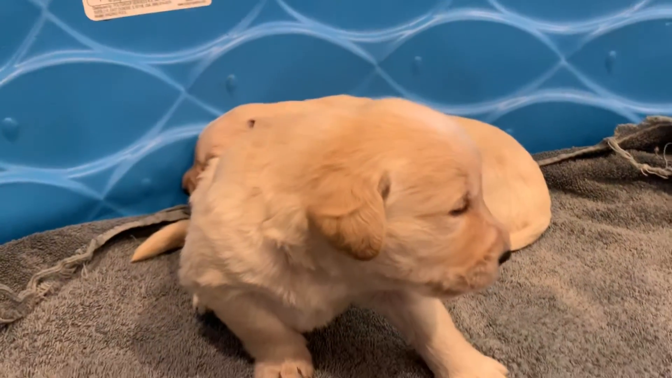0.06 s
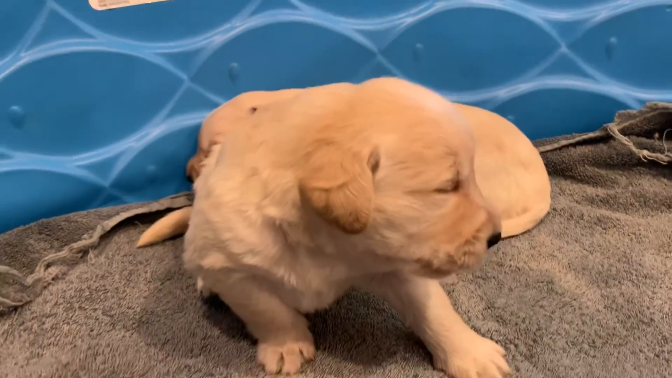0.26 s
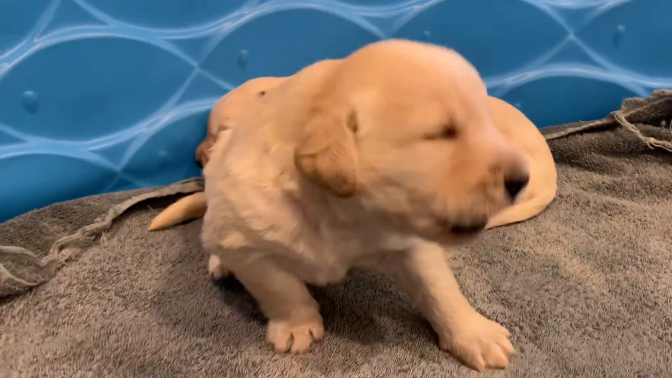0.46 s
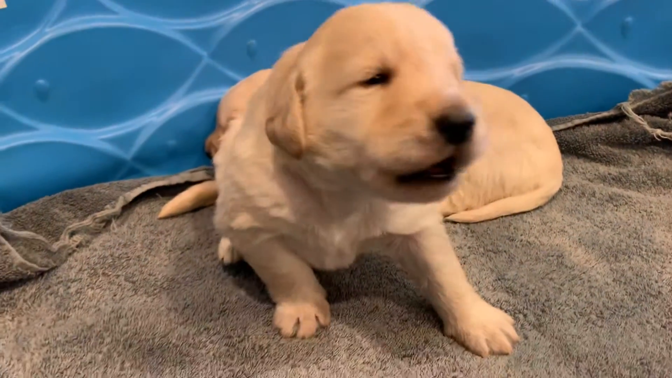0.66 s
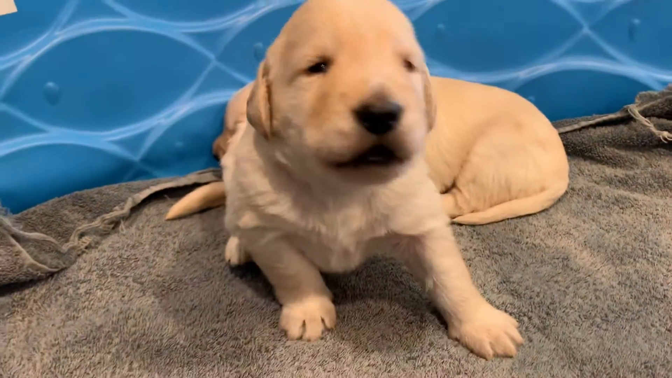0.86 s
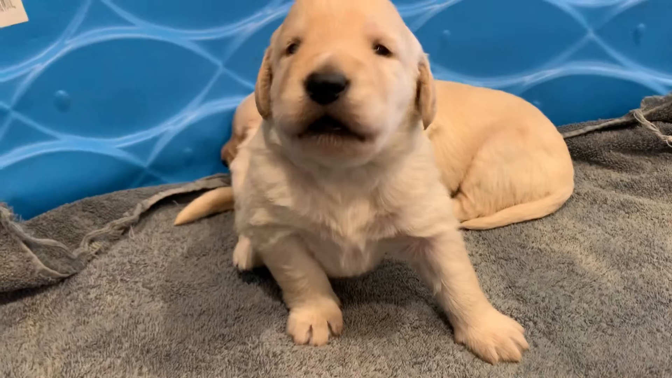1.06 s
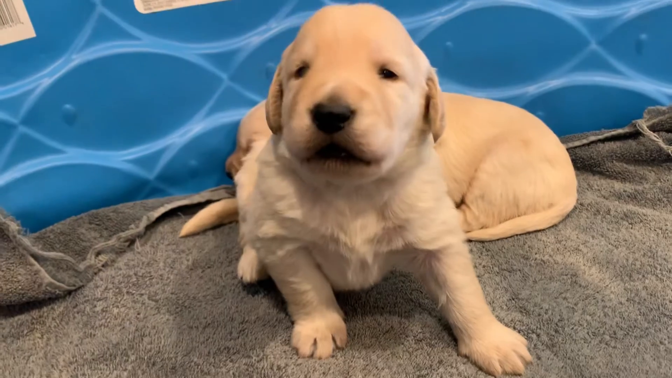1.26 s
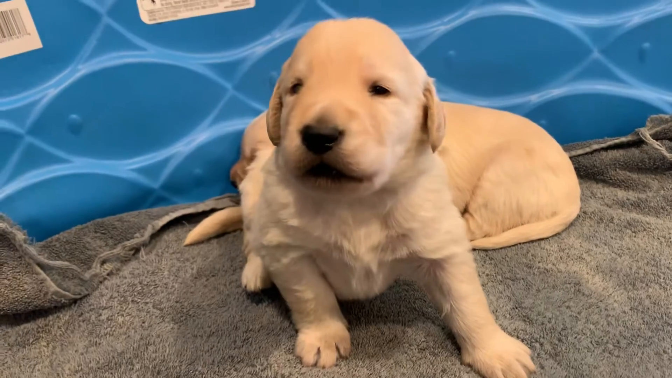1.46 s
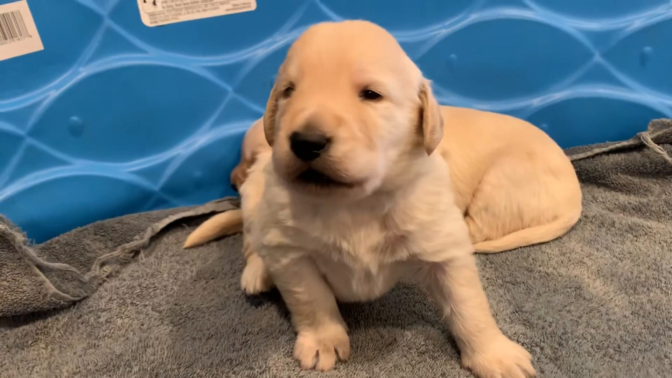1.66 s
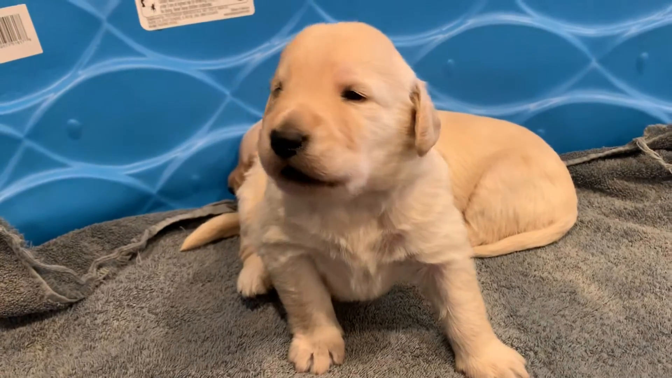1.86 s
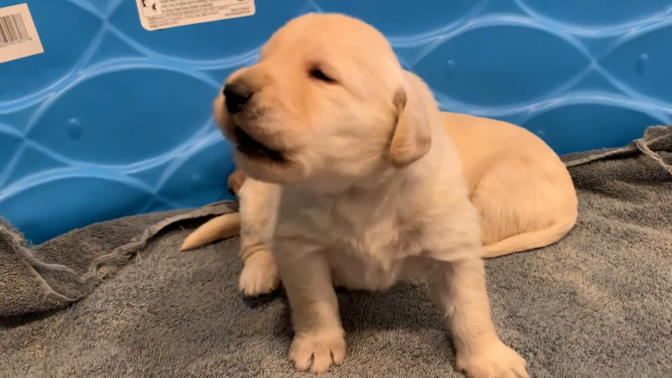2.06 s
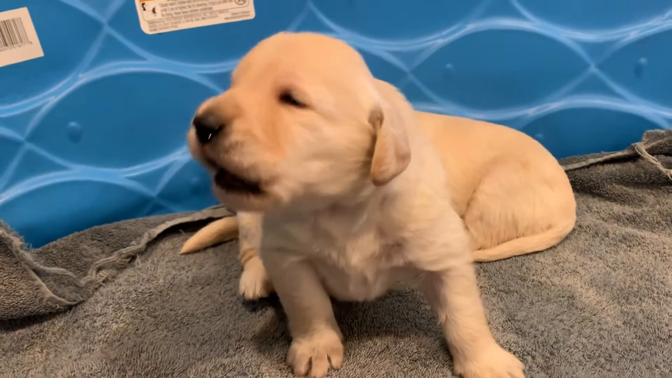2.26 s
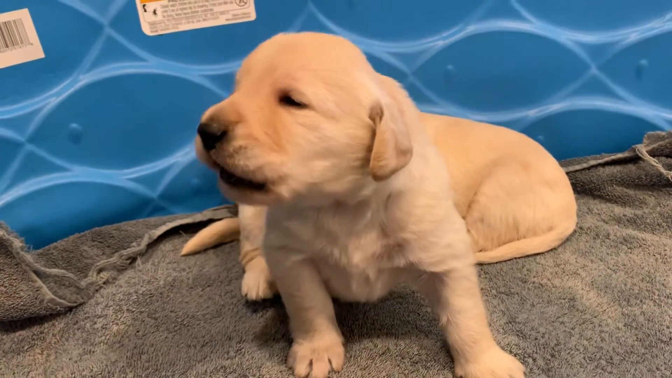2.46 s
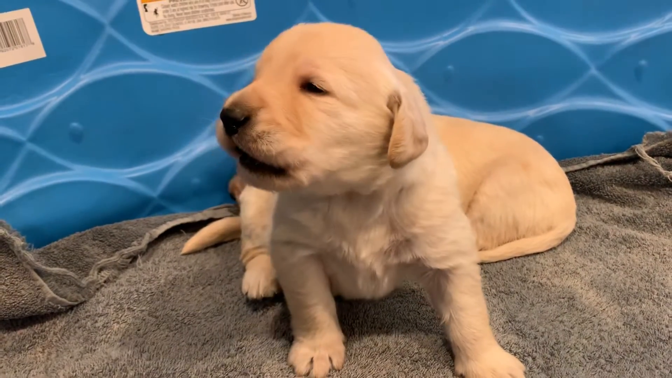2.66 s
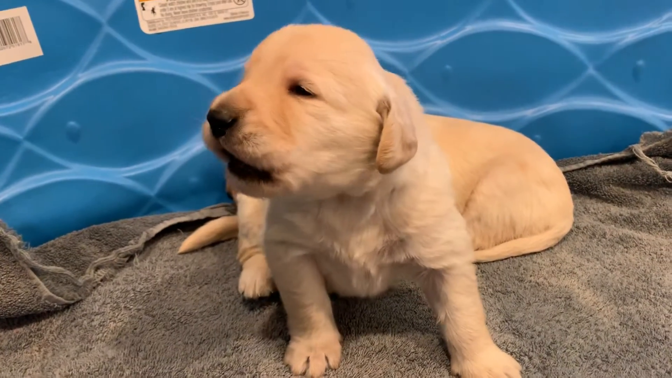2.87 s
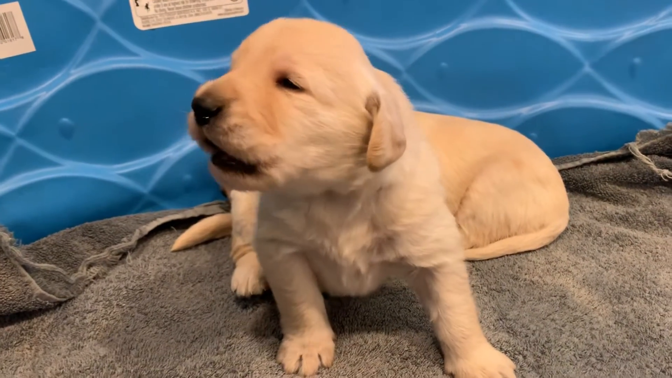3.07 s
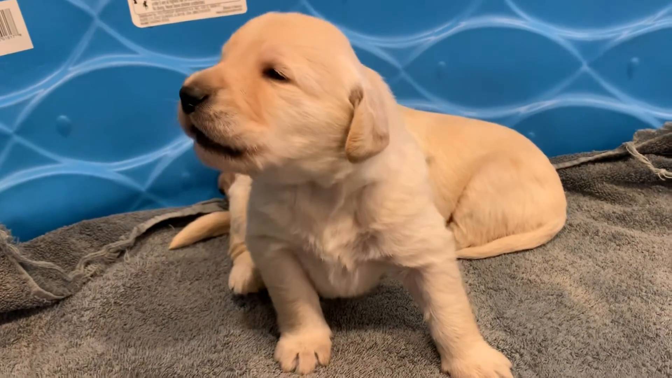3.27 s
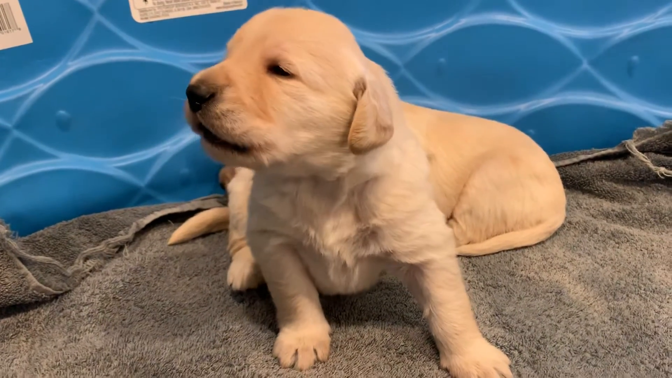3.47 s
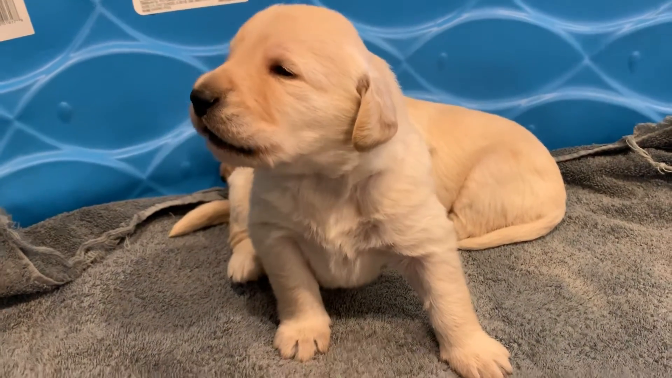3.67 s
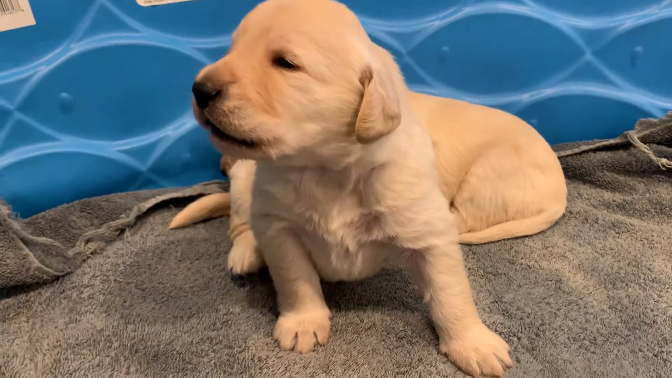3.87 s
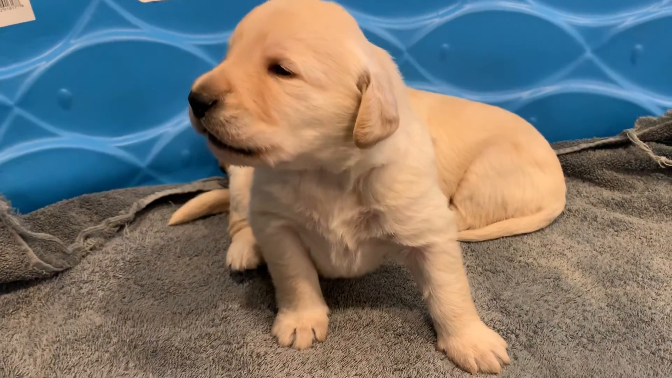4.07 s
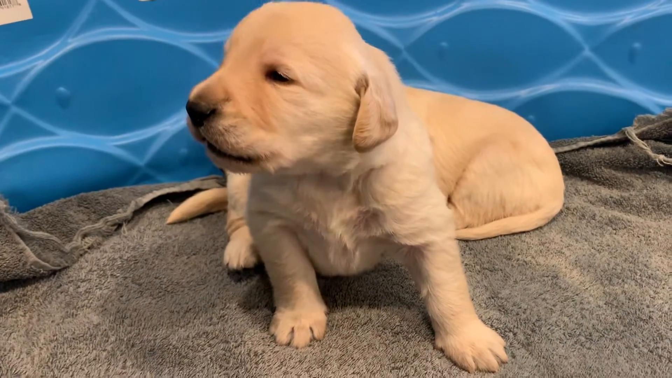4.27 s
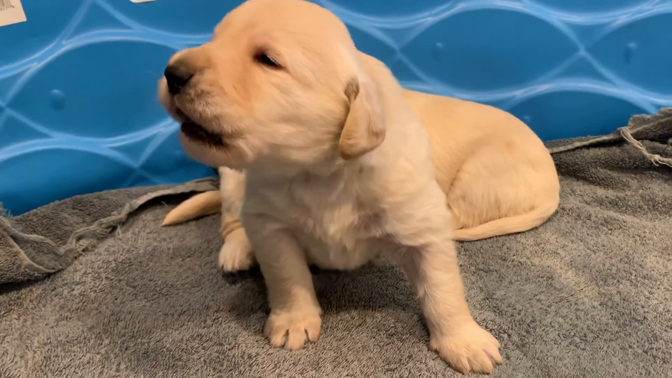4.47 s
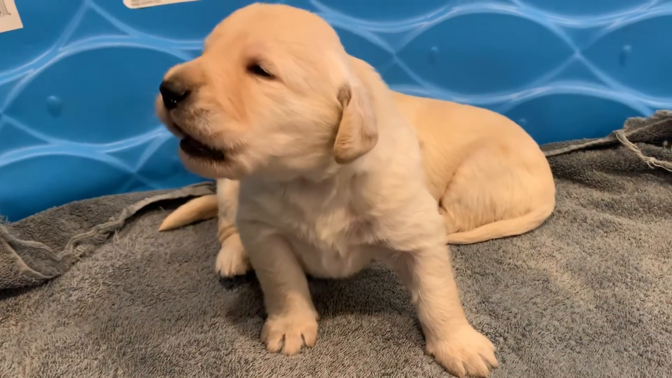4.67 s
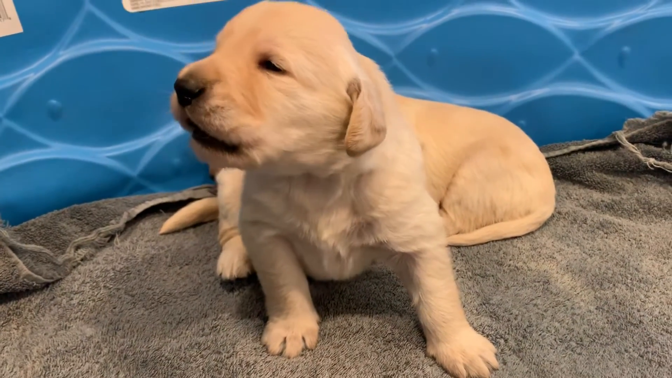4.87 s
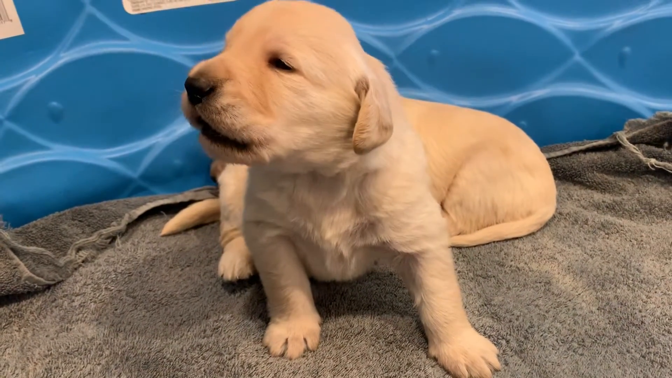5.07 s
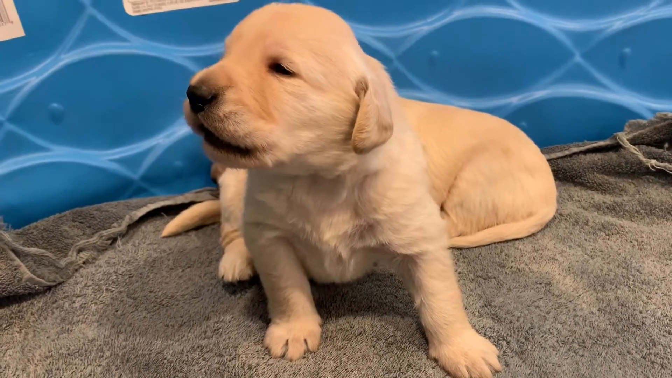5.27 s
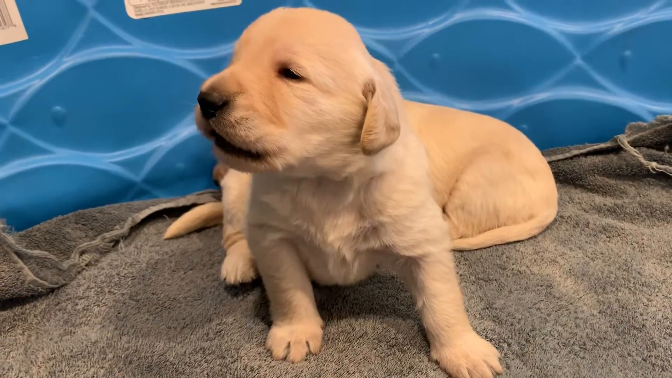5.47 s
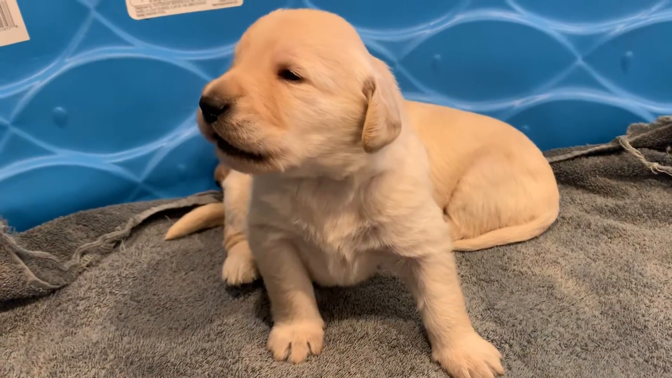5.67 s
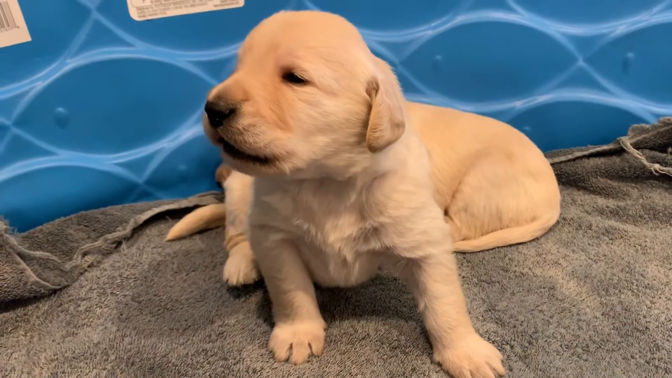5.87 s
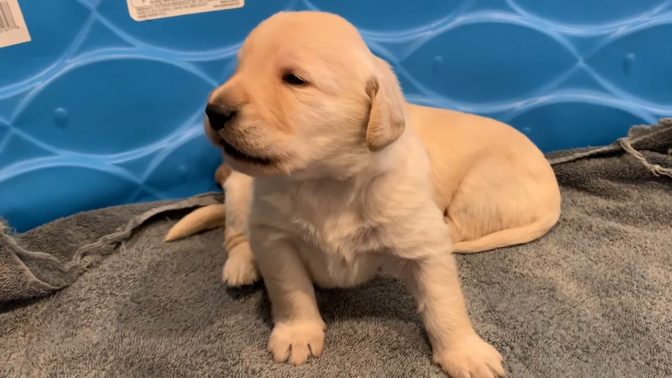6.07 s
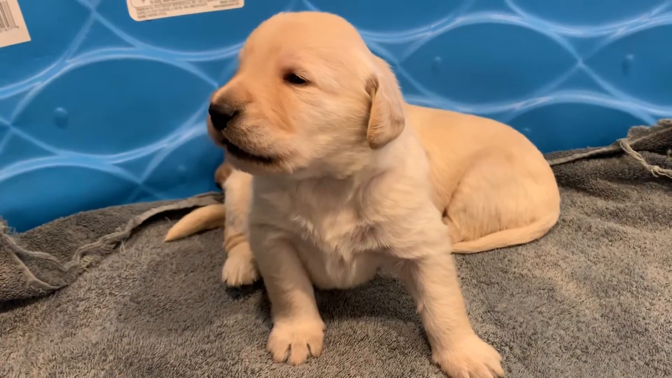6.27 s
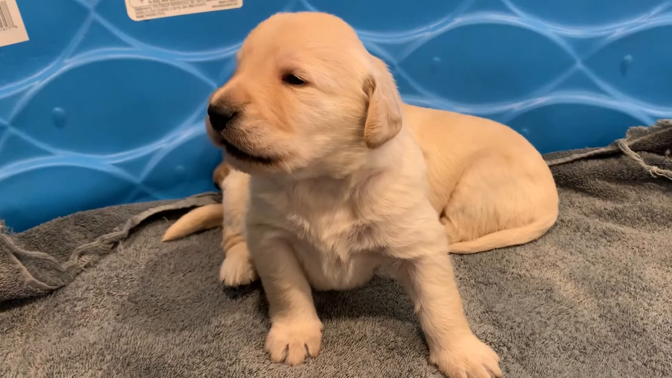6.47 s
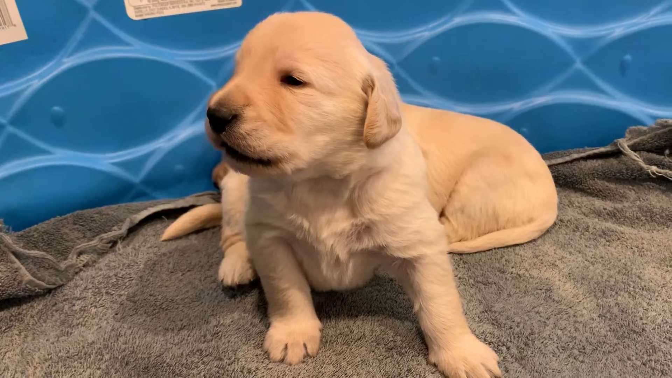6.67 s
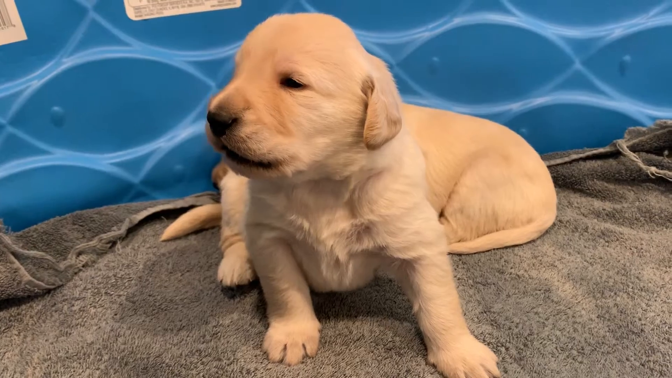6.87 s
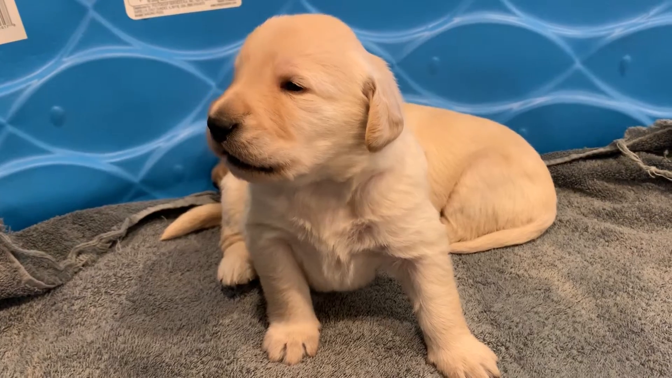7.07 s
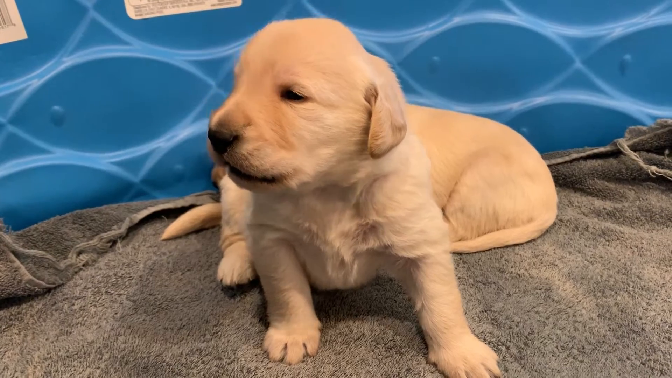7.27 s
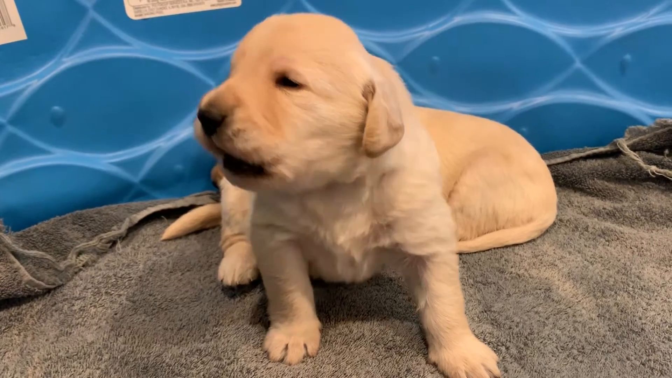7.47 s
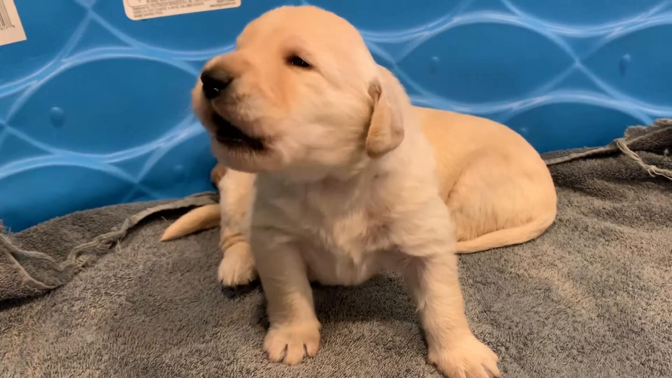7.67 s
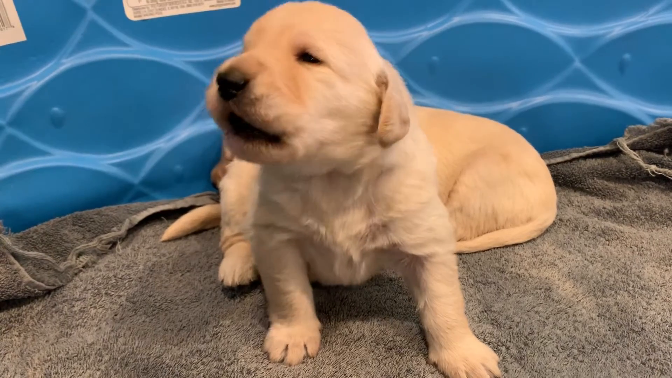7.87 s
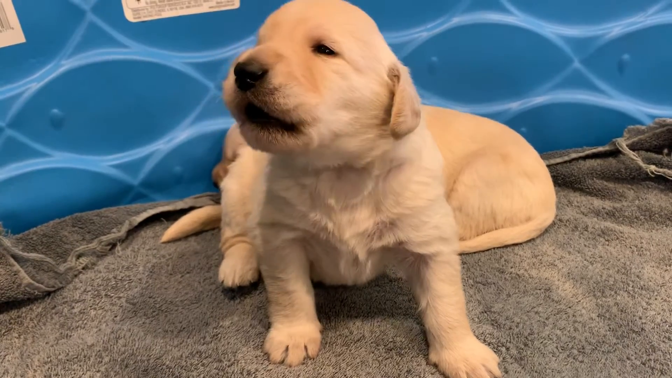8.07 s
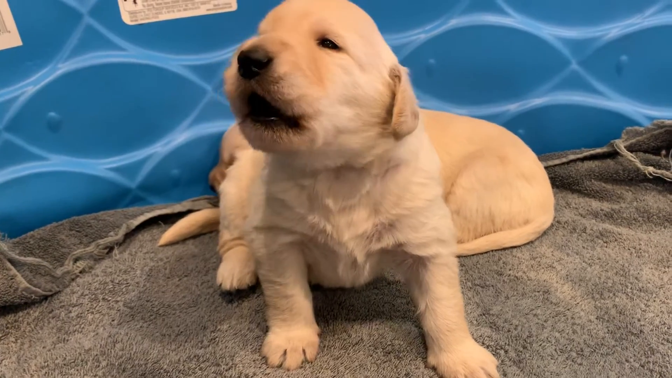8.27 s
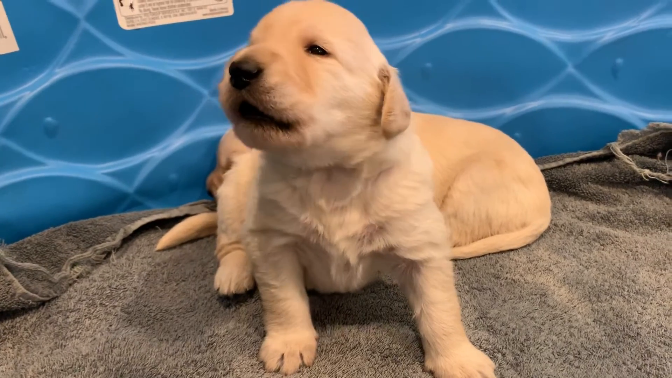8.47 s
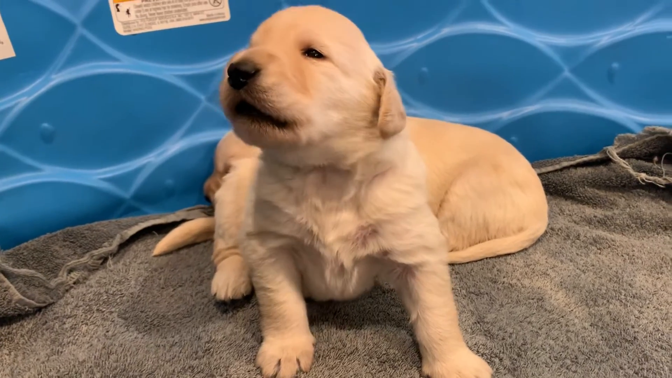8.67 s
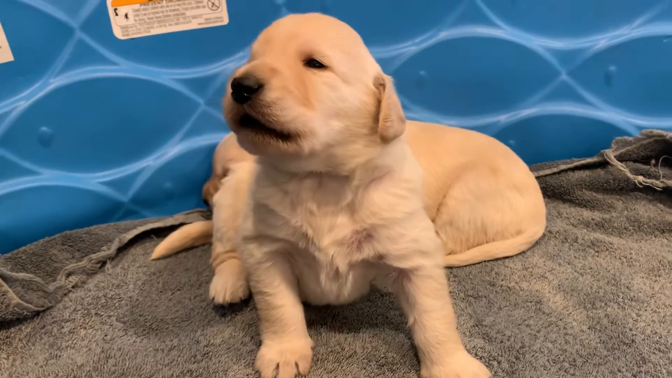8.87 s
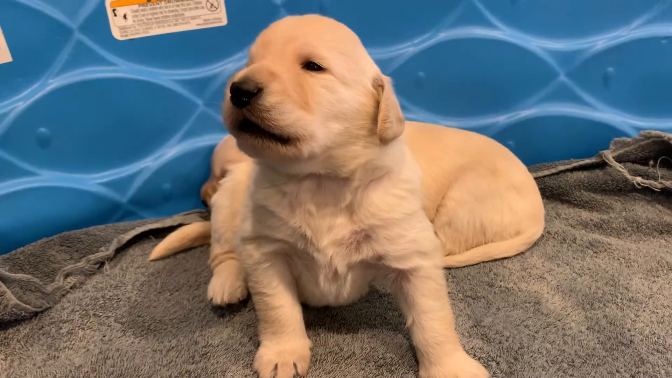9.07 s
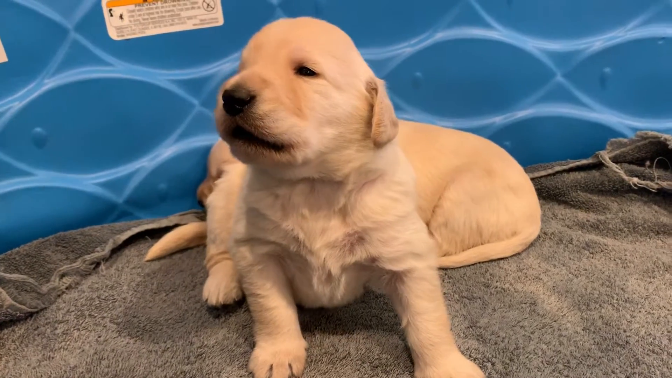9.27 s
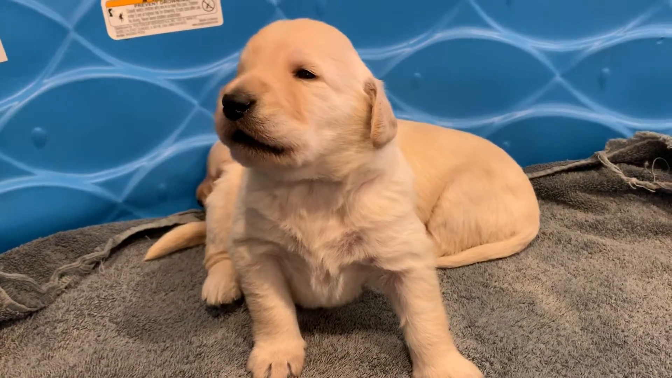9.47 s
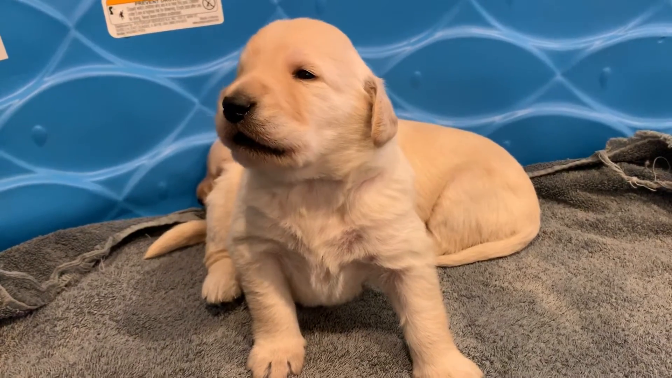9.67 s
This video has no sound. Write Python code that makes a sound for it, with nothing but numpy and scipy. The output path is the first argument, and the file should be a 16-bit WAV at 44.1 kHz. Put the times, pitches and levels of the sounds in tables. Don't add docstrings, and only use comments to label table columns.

```python
import sys
import numpy as np
from scipy import signal
from scipy.fft import rfft, irfft, next_fast_len
from scipy.io import wavfile
from scipy.ndimage import uniform_filter1d, minimum_filter1d, map_coordinates

SR = 44100
rng = np.random.default_rng(int(sys.argv[2]) if len(sys.argv) > 2 else 0)


def log_audio(samples):
    frames = np.atleast_2d(samples).T
    limited = np.clip(frames, -1, 1)
    pcm = np.round(limited * 32767).astype(np.int16)
    wavfile.write(sys.argv[1], SR, pcm)


def volts_from_db(level):
    exponent = np.asarray(level, float) / 20
    return 10 ** exponent


N = 428211
T = np.arange(N) / SR
TURN_S = 1.5
LOUD_CRY_HZ = 1100

# start/s, end/s
CALLS = [
    (0.03, 1.0),
    (2.02, 3.3),
    (4.416, 6.225),
    (7.503, 8.72),
]
# top t/s, top f/Hz, rise/s, fall/s, level/dB
YELPS = [
    (0.618, 1260, .12, 0.11, 2.4),
    (2.2, 1358, .175, .16, 1.13),
    (3.073, 972.2, .062, .08, -0.56),
    (4.585, 1353, .177, .15, 0.67),
    (7.68, 1377, .185, .17, -0.37),
    (8.359, 936, 0.084, .085, 2.2),
]
# undertone level/dB, top flatness/1, extra mouth/dB, extra rasp rising/dB, grip lost after top/s
YELP_COLOURS = [(-28, 3.4, 4, 8, .049), (-15, 2.1, 3, 7, 0.027), (-13, 2.2, 1, 1.6, 0.072),
                (-14, 2.1, 2, 5, 0.11), (-15.5, 2.3, 4, 9, 0.044), (-28, 2.6, -4, 2, 0.15)]
# t of a flap/s, flap rate/Hz
FLAPS = [(.09, 19.9), (.78, 20.1), (2.37, 19.9), (4.844, 21.1), (7.849, 22.3), (8.503, 19.2)]
# t/s, pitch f/Hz, level/dB, flutter level/dB, lips open level/dB
GROWL_1 = [(.03, 156, -40.5, 2, -18), (.09, 150, -36.5, 6.5, -18), (.35, 156.6, -33, -2, -16.5),
           (.45, 165, -35, -4.7, -5), (.76, 165.6, -36, 1.5, 8.5), (.86, 166.8, -37, -4.5, -0.5),
           (.92, 155, -33.5, 6, -28), (1.01, 148.4, -66, 4, 4)]
GROWL_2 = [(2.02, 170.3, -49.5, .3, 0.5), (2.42, 171.3, -33, 1.17, -4), (2.71, 167.5, -35, 1.2, -10.5),
           (2.76, 167.5, -33.5, 3.6, 0), (2.86, 163.8, -36.5, 0.98, 3), (2.95, 169.8, -32, 0.94, 10.5),
           (3.15, 164.8, -50, 0.77, 29), (3.239, 165, -46, 0.266, -3), (3.321, 155, -79, 0.23, -5)]
GROWL_3 = [(4.79, 175, -38, .3, -8), (4.819, 172.7, -31.5, .3, 6), (5.05, 164, -37, 1, 2.9),
           (5.55, 156, -38, 5.2, 1.5), (5.902, 141.1, -42.5, 13.3, -2.5), (6.06, 127.5, -48, 63, 0),
           (6.11, 132.6, -42, 15, -2), (6.202, 126.4, -47, 11, -1), (6.261, 124.7, -80, 7.6, -8)]
GROWL_4 = [(7.9, 189.5, -36, 2.5, -2.5), (7.959, 184.9, -31.5, 1.7, -0.5), (8.142, 178.9, -33.5, 0.17, 3),
           (8.221, 185, -31, 1.5, 9), (8.498, 165.8, -43, 0.7, 13), (8.559, 158.3, -35, 1.6, -16),
           (8.65, 146.8, -55, 4.1, -4), (8.74, 125.8, -107, 6, -13.5)]
# tension f/Hz, chest/dB, nose/dB, mouth/dB, rasp/dB
PUSH = [(155, -83, -86.5, -88, -93), (198.96, -35, -39.5, -39.5, -58), (320, -31, -29, -26.5, -33.5),
        (485, -35, -29.5, -20.5, -30), (690, -43, -25, -13, -25), (850, -53, -31, -26, -33),
        (970, -56, -21, -20, -19.5), (1120, -56, -48, -10, -21.5), (1400, -60.5, -38, -3.5, -21)]
# level/dB past the top, past the break, in the growl, chin down
FALLING_DB = [1, 1.94, 2, -7]
BROKEN_DB = [0, -0.97, -3.5, -4.5]
GROWL_DB = [-0.73, -8.5, -8, -21.5]
TUCK_DB = [-0.35, 2, -11, 5]
# dB per dB of growl softness, dB per dB of lip opening
THINNING = [.01, 1, 1, 0.21]
LIPS = [0.011, .2, .55, 1.2]
# f/Hz, width/Hz, level/dB
CHEST = [(200, 110, -5), (300, 90, 0)]
NOSE_DOWN = [(640, 330, 0)]
NOSE_UP = [(738, 285, 0)]
MOUTH = [(1295, 230, 0)]
# f/Hz, width/Hz, level/dB
RASP_TUCKED = [(1850, 500, 0), (4800, 990, -9), (6900, 1100, -4.5), (7650, 700, -7), (10100, 6900, -17)]
RASP_SHUT = [(1832, 400, -3), (4000, 330, 2.5), (5070, 630, -9), (6870, 1100, -3), (8780, 820, -5.5),
             (11190, 600, -4), (14200, 730, -14)]
# f/Hz, width/Hz, level/dB
RASP_GAPE = [(2070, 330, 1.5), (3130, 400, -5.5), (3730, 350, -1.5), (5900, 700, -4), (6900, 900, -8),
             (8600, 600, -13.5), (11550, 900, -13.5), (14600, 1200, -20)]
RASP_OPEN = [(2150, 1100, -4), (3400, 410, 0.5), (3814, 280, .5), (4974, 830, -5), (5916, 600, -3.5),
             (7030, 500, -7.5), (8600, 600, -11.5), (11340, 600, -11), (14600, 1200, -16.5)]
# f/Hz, left-right level/dB
FACING_DB = [(60, -2.5), (150, -6.5), (380, 4), (950, 4.5), (2380, 3.5), (5980, -13), (15000, 0)]
ACROSS_DB = [(60, 5), (150, -4), (380, 3), (950, 10.5), (2380, -1.5), (5980, -4), (15000, 3.5)]
# f/Hz, left lead/rad
FACING_RAD = [(0, 0), (2070, -0.5), (4480, 0.6), (6290, 7.9), (8610, 5.7), (10900, 0.2), (12300, -0.4),
              (15500, -12.8)]
ACROSS_RAD = [(300, 0.1), (1120, .5), (2200, 2.1), (3100, 2.9), (6980, 7.7), (9040, 3.9), (11300, 0.1),
              (15500, -6.4)]
# t/s, f/Hz, level/dB
SQUEAK = [(9.06, 1534, -94), (9.098, 1563, -43.5), (9.158, 1740, -42), (9.19, 1655, -48.5),
          (9.2, 1730, -54), (9.212, 1682, -90), (9.242, 1670, -77), (9.27, 1666, -87)]
# multiple/1, level/dB
SQUEAK_TONES = [(2, -41.5), (3, -26.5), (4, -30), (5, -42)]
# t/s, length/s, level/dB
SNIFFS = [(6.47, .06, -80), (6.618, 0.099, -80), (6.842, 0.021, -77.5), (9.105, 0.25, -81),
          (9.314, 0.19, -68)]
# t/s, level/dB, f/Hz, t60/s
PAWS = [(1.196, -58.5, 933, 0.028), (1.549, -55.5, 393, 0.041), (8.945, -51, 467, .07),
        (8.959, -49, 225, 0.15), (9.21, -62, 300, 0.09)]
# f/Hz, t60/s
PEN = [(200, .15), (1500, .16), (8000, .12)]
# t/s, level/dB, length/s
BUMPS = [(0.0, -62.5, 0.27), (0.853, -58.5, 0.18), (2.342, -55, .17), (3.155, -54, 0.044), (3.778, -74, .2),
         (4.378, -54.5, 0.052), (5.2, -59, 0.91), (6.7, -72, 0.41), (7.868, -57.5, 0.24), (8.248, -62, .15),
         (8.6, -54, 0.0494), (8.961, -61, 0.03054), (9.2, -63, 0.2601)]
# f/Hz, density level/dB per Hz
HUM_COLOUR = [(20, -16), (59, 0), (91, -8), (123, -12.5), (200, -36), (300, -23.5), (390, -51.5),
              (660, -120)]
HUSH_COLOUR = [(120, -36), (200, 4), (273, -1.5), (1860, -15.5), (8320, -24.5), (9460, -27.5), (11600, -21),
               (15000, -35)]
GROWL = GROWL_1 + GROWL_2 + GROWL_3 + GROWL_4


def unit(x):
    return x / np.sqrt(np.mean(x ** 2) + 1e-20)


def even(x, span_s=.04):
    return x / np.sqrt(np.abs(uniform_filter1d(x ** 2, int(span_s * SR))) + 1e-12)


def along(points, hz):
    f, v = np.transpose(points)
    return np.interp(np.log(hz + 1), np.log(f + 1), v)


def curves(rows):
    s, *cols = np.transpose(rows)
    return np.array([np.interp(T, s, c) for c in cols])


def wobble(rate_hz):
    return map_coordinates(rng.standard_normal(int(N * rate_hz / SR) + 4), [T * rate_hz])


def filtered(x, response):
    m = next_fast_len(N + SR // 4)
    return irfft(rfft(x, m) * response(np.fft.rfftfreq(m, 1 / SR)), m)[..., :N]


def ringing(modes):
    def response(f):
        total = 0
        for k, (hz, width_hz, db) in enumerate(modes):
            damping = 1j * f * width_hz
            total = total + (-1) ** k * volts_from_db(db) * damping / (hz * hz - f * f + damping)
        return total
    return response


def band(low_hz, high_hz):
    return lambda f: 1 / (1 + (low_hz / (f + 1)) ** 20) / (1 + (f / high_hz) ** 20)


def ring(x, modes, low_hz, high_hz):
    return unit(filtered(x, lambda f: ringing(modes)(f) ** 2 * band(low_hz, high_hz)(f)))


def puppy():
    pulses, puffs, noisy, strain, opened, flutter, tick = folds()
    voice = (1 - noisy) * pulses + 5 * noisy * puffs
    rough = (1 - noisy) * pulses + 5 * (noisy + strain) * puffs
    chest_drive = pulses + (1.5 * noisy + .5 * opened) * puffs
    facing = T < TURN_S

    chest = filtered(chest_drive, lambda f: ringing(CHEST)(f) * band(126, 432)(f))
    nose = np.where(facing, ring(voice, NOSE_DOWN, 480, 1050), ring(voice, NOSE_UP, 480, 1050))
    mouth = ring(voice, MOUTH, 1050, 2100)
    jaw_shut = np.where(facing, ring(rough, RASP_TUCKED, 1700, 15800), ring(rough, RASP_SHUT, 1700, 15800))
    jaw_open = np.where(facing, throat(rough, RASP_GAPE), throat(rough, RASP_OPEN))
    jaw_open = filtered(jaw_open, lambda f: 1 - 0.7 * np.exp(-((f - 3050) / 260) ** 2))
    rasp = (1 - opened) * even(jaw_shut) + opened * even(jaw_open)

    paths = [even(chest), tick * even(nose), tick * even(mouth), tick * rasp]
    return sum(gain * path for gain, path in zip(effort(), paths)) * flutter


def throat(rough, modes):
    shortening = 1.09
    short_modes = [(hz * shortening if hz < 8000 else hz, w, db) for hz, w, db in modes]
    early = 0
    for top_s, _, rise_s, *_ in YELPS:
        early = early + np.exp(-((T - top_s + .6 * rise_s) / (.6 * rise_s)) ** 2)
    early = np.clip(early, 0, 1)
    return early * ring(rough, short_modes, 1700, 15800) + (1 - early) * ring(rough, modes, 1700, 15800)


def folds():
    growl_hz, _, dip_db, _ = curves(GROWL)
    arches = [arch_of(*yelp[:4], colour[1]) for yelp, colour in zip(YELPS, YELP_COLOURS)]
    lift_hz, flaps = sum(lift for _, lift in arches), palate()
    lifted = lift_hz / 185
    hz = growl_hz + lift_hz
    noisy = .42 + .3 * lifted
    sway = .12 * np.clip((growl_hz - 125) / 40, .45, 1) * (1 - .4 * lifted)
    hz = hz * np.exp(-(sway + .04) * np.cos(2 * np.pi * flaps) + .02 * wobble(90))

    opened, under, flank, strain = np.zeros((4, N))
    split, shake = np.ones(N), wobble(140)
    for (top_s, top_hz, *_), (under_db, *_), (arch_hz, _) in zip(YELPS, YELP_COLOURS, arches):
        loud = top_hz > LOUD_CRY_HZ
        high = np.clip((arch_hz / top_hz - .45) / .35, 0, 1)
        between = high * (1 - high)
        flank += 4 * between
        hz = np.maximum(hz, arch_hz * np.exp((.017 + .12 * between + .03 * (1 - high)) * shake))
        clear_rising = np.clip(arch_hz / 500, 0, .8 if loud else .45) + (.2 if loud else .55) * high
        noisy = noisy + (.065 - noisy) * np.where(T < top_s, clear_rising, high ** 2)
        strain += .5 * loud * high + .01 * high
        opened = np.maximum(opened, np.clip((arch_hz - 100) / 400, 0, 1))
        under += volts_from_db(under_db) * high
        split[arch_hz > 0] = 3 if loud else 2
    jaw_samples = .05 * SR
    closing = signal.lfilter([1 / jaw_samples], [1, 1 / jaw_samples - 1], opened)
    opened = np.maximum(opened, closing)

    phase = 2 * np.pi * np.cumsum(hz) / SR
    pulses = sum(k ** -.7 * np.cos(k * phase) * (k * hz < 9000) for k in range(1, 31))
    pulses *= volts_from_db((1.2 + 3 * flank) * wobble(170))
    undertone = np.cos(phase / split) + .6 * np.cos(2 * phase / split)
    pulses *= 1 + 2 * under * volts_from_db(4 * wobble(60)) * undertone
    breath_gate = .3 + np.maximum(np.cos(phase), 0) ** 2
    puffs = rng.standard_normal(N) * breath_gate * volts_from_db(2.8 * wobble(90))

    dip_db = dip_db * (1 - opened)
    palate_shut = np.clip(np.cos(2 * np.pi * (flaps + .2)) + .15, 0, 1)
    tick_db = .4 * dip_db * np.exp(-(flaps % 1) / .12)
    return pulses, puffs, np.clip(noisy, 0, 1), strain, opened, volts_from_db(-dip_db * palate_shut), volts_from_db(tick_db)


def arch_of(top_s, top_hz, rise_s, fall_s, flat):
    before_s = np.maximum(top_s - rise_s - T, 0)
    after_s = np.maximum(T - top_s - fall_s, 0)
    lift_hz = np.where(T < top_s, 136.3 * np.exp(-before_s / .03), 185 * np.exp(-after_s / (.45 * fall_s)))
    from_top = np.abs((T - top_s) / np.where(T < top_s, rise_s, fall_s))
    return top_hz * (1 - from_top ** flat), lift_hz


def palate():
    restart_s, tiring_per_s2 = .15, .45
    flap_s, rate_hz = np.transpose(FLAPS)
    now = np.maximum(np.searchsorted(flap_s - restart_s, T) - 1, 0)
    since_s = np.clip(T - flap_s[now], -1, 2)
    return rate_hz[now] * since_s - tiring_per_s2 * since_s ** 2


def effort():
    column = lambda v: np.array(v)[:, None]
    rest_hz, firm_db = 150, -35
    _, level_db, _, lips_db = curves(GROWL)
    growl_db = level_db + column(GROWL_DB) + column(LIPS) * lips_db
    growl_db += column(TUCK_DB) * (T < YELPS[0][0])
    growl_db += column(THINNING) * np.minimum(level_db - firm_db, 0)
    power = volts_from_db(growl_db) ** 2

    tension_hz, *push_db = np.transpose(PUSH)
    for (top_s, top_hz, rise_s, fall_s, db), (_, flat, mouth_db, rasp_db, grip_s) in zip(YELPS, YELP_COLOURS):
        arch_hz, lift_hz = arch_of(top_s, top_hz, rise_s, fall_s, flat)
        tight = np.log(np.maximum(arch_hz, rest_hz + lift_hz))
        cry_db = db + np.array([np.interp(tight, np.log(tension_hz), c) for c in push_db])
        cry_db += column(FALLING_DB) * np.clip((T - top_s) / (0.27 * fall_s), 0, 1)
        cry_db += column(BROKEN_DB) * (T > top_s + grip_s)
        rising = np.clip((top_s - T) / (.4 * rise_s), 0, 1)
        summit = np.clip((arch_hz / top_hz - .8) / .05, 0, 1)
        cry_db[2] += mouth_db * (rising if top_hz > LOUD_CRY_HZ else summit)
        cry_db[2] += -10.5 * (T > top_s) * np.exp(-(4 * (tight - np.log(654))) ** 2)
        cry_db[3] += rasp_db * rising
        left_s = top_s + grip_s - T
        stutter_db = -11 * (left_s > 0) * np.exp(-np.abs(left_s) / .035) * np.sin(np.pi * 75 * left_s) ** 6
        power += volts_from_db(uniform_filter1d(cry_db, 200) + stutter_db) ** 2 * (lift_hz > 1)

    attack_s, attack_db = .03, -14
    swell_db, sounding = np.zeros((2, N))
    for start_s, end_s in CALLS:
        swell_db += attack_db * np.clip(1 - (T - start_s) / attack_s, 0, 1) * (T > start_s - .01)
        sounding += (T > start_s) * (T < end_s)
    return np.sqrt(power) * volts_from_db(swell_db) * uniform_filter1d(sounding, 100)


def ports(x, balance, lead):
    half = lambda f: volts_from_db(along(balance, f) / 2) * np.exp(.5j * np.interp(f, *np.transpose(lead)))
    return filtered(x, lambda f: np.array([half(f), 1 / half(f)]))


def mate():
    hz, db = curves(SQUEAK)
    phase = 2 * np.pi * np.cumsum(hz) / SR
    tone = np.sin(phase) + sum(volts_from_db(level) * np.sin(round(k) * phase) for k, level in SQUEAK_TONES)
    inside = uniform_filter1d(1. * (T > SQUEAK[0][0]) * (T < SQUEAK[-1][0]), 600)
    out = np.sqrt(2) * volts_from_db(db + 1.54 * wobble(50)) * tone * inside

    nostrils = ringing([(4883, 340, -6), (6900, 480, 6.5), (8000, 980, 9)])
    air = unit(filtered(rng.standard_normal(N), nostrils))
    for s, length_s, db in SNIFFS:
        out += air * volts_from_db(db) * np.exp(-.5 * ((T - s) / (0.37 * length_s)) ** 2)

    for s, db, hz, t60_s in PAWS:
        knock = rng.standard_normal(N) * (T > s) * volts_from_db(-60 * np.abs(T - s) / t60_s)
        knock = filtered(knock, lambda f: ringing([(hz, hz, 0)])(f) ** 2 / (1 + (f / (3 * hz)) ** 2))
        out += volts_from_db(db) * knock / np.abs(knock).max()
    return out


def pen(x):
    hz, t, z = signal.stft(rng.standard_normal((2, SR // 3)), SR, nperseg=256)
    decay = volts_from_db(-60 * t / along(PEN, hz)[:, None])
    tail = signal.istft(z * decay, SR, nperseg=256)[1]
    delayed = np.pad(x, (150, 0))[None]
    return signal.fftconvolve(delayed, tail / np.linalg.norm(tail[0]), axes=1)[:, :N]


def hiss(spectrum, alike):
    common, own = rng.standard_normal(N), rng.standard_normal((2, N))
    mixed = np.sqrt(alike) * common + np.sqrt(1 - alike) * own
    return unit(filtered(mixed, lambda f: volts_from_db(along(spectrum, f))))


def house():
    hum_db, hush_db = -76, -79
    level = volts_from_db(hum_db)
    for s, db, length_s in BUMPS:
        level = level + volts_from_db(db) * np.exp(-.5 * ((T - s) / length_s) ** 2)
    hum = level * volts_from_db(1.5 * wobble(7)) * hiss(HUM_COLOUR, alike=.86)
    return hum + volts_from_db(hush_db + .8 * wobble(3)) * hiss(HUSH_COLOUR, alike=.7)


def scene():
    port_low_hz = 115
    dog, other = filtered(puppy(), band(port_low_hz, SR)), mate()
    facing = ports(dog * (T < TURN_S), FACING_DB, FACING_RAD)
    across = ports(dog * (T >= TURN_S), ACROSS_DB, ACROSS_RAD)
    walls = volts_from_db(-17) * pen(dog + other)
    return facing + across + other + walls + house()


def low_pass(x):
    return signal.sosfilt(signal.butter(12, 15930, fs=SR, output="sos"), x)


def record(dry):
    ceiling, limit_s = .97, .004
    need = np.minimum(1, ceiling / (np.abs(dry).max(axis=0) + 1e-9))
    span = int(limit_s * SR)
    gain = uniform_filter1d(minimum_filter1d(need, 2 * span), span)
    return low_pass(gain * dry)


dry = scene()
out = record(dry)
log_audio(out)
```